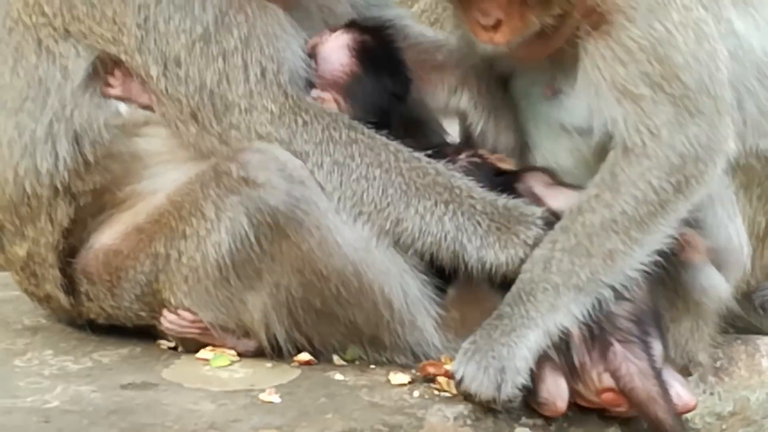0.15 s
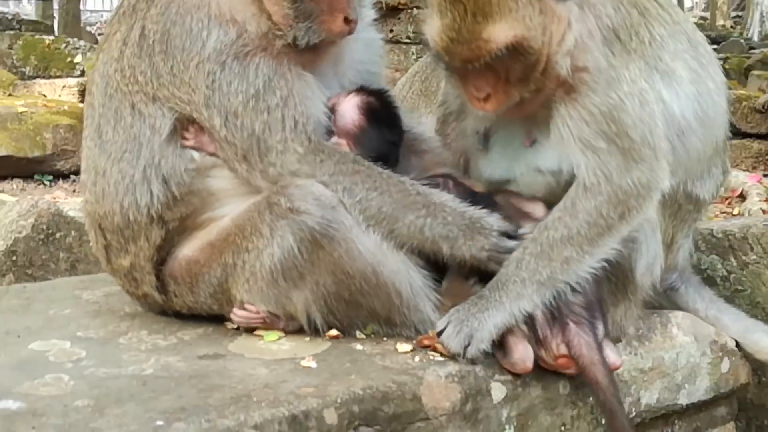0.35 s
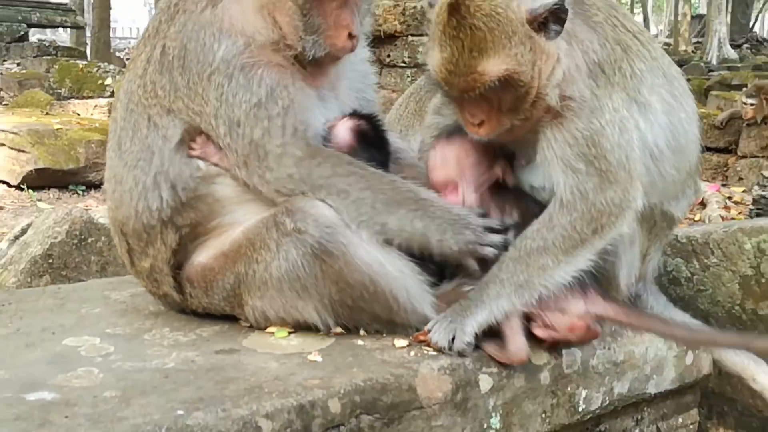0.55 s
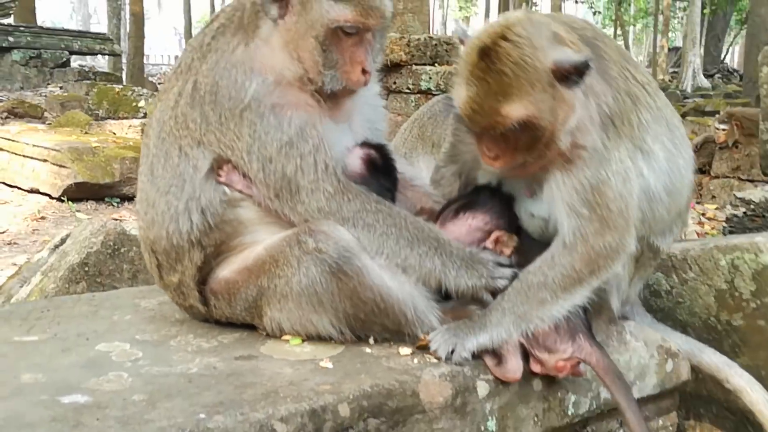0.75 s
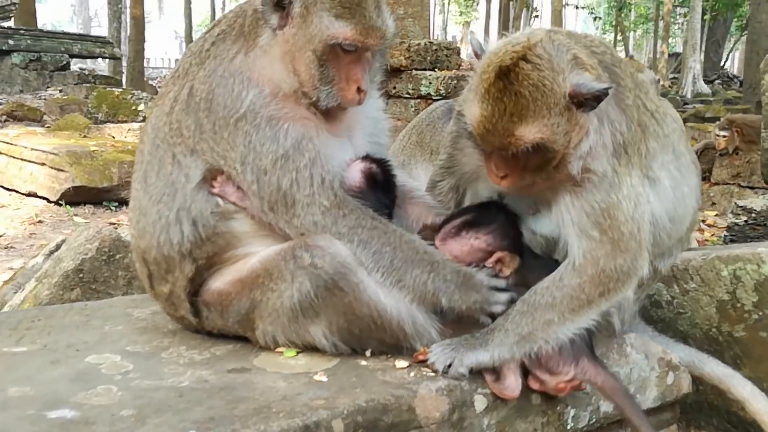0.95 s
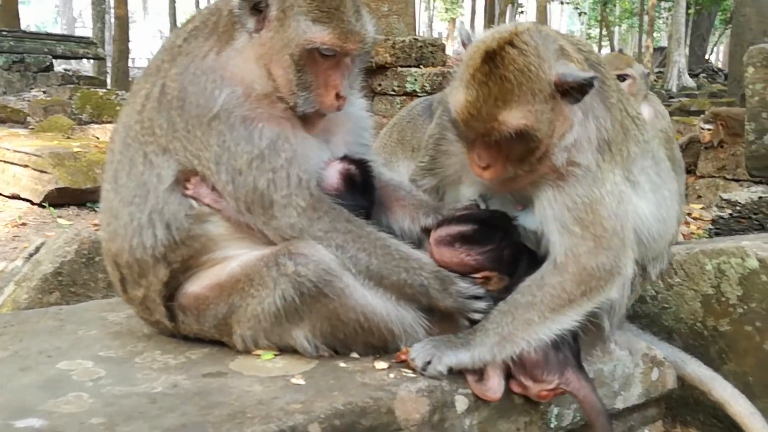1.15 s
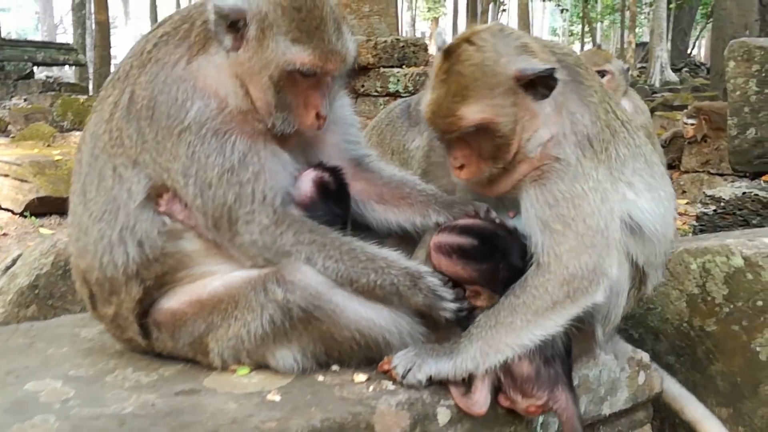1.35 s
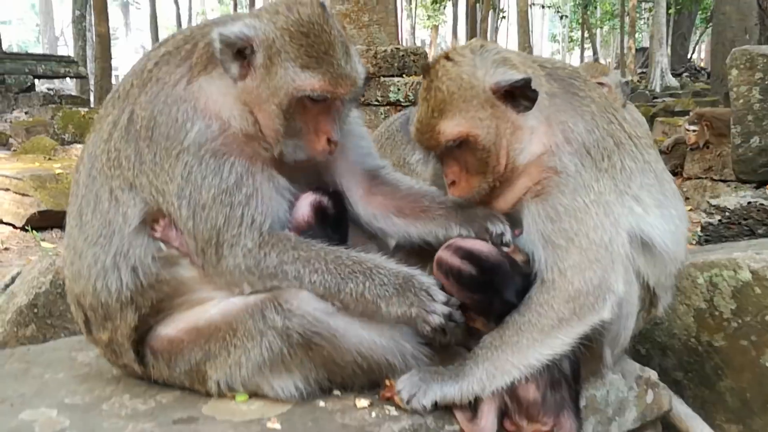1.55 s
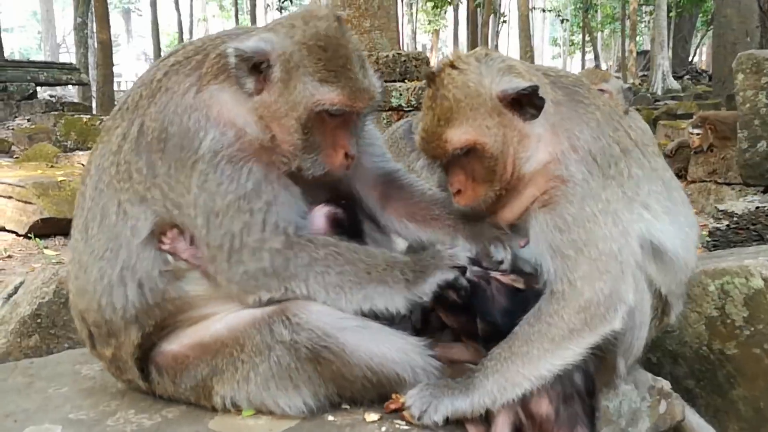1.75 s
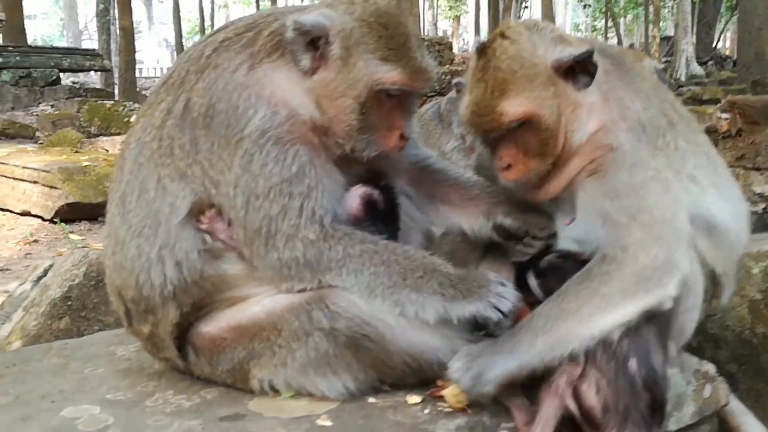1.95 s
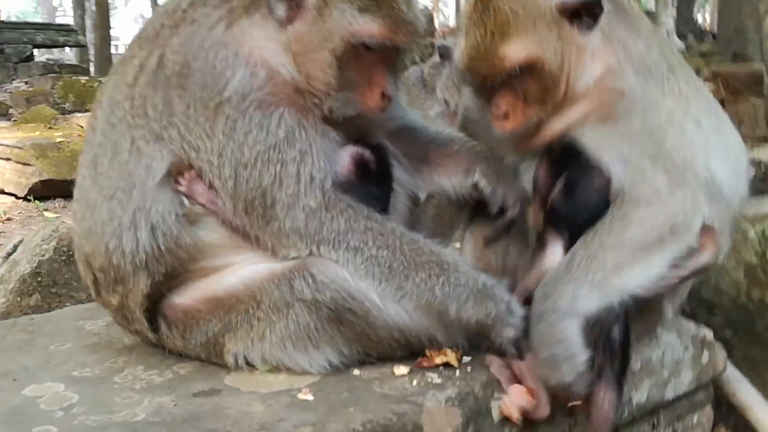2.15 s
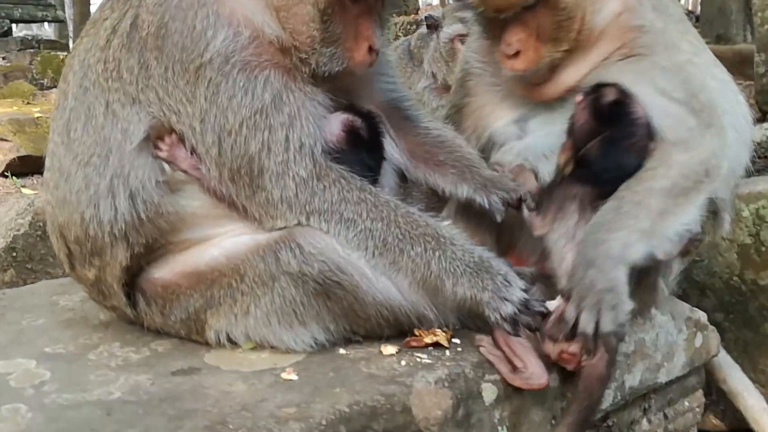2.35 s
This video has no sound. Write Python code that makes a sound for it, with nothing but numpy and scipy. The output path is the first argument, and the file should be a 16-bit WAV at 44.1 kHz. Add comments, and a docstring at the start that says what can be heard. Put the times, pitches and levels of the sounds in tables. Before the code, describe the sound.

A newborn monkey squeals in seven short, very high squeaks and screeches in a quiet wood.

```python
"""A newborn monkey squeals seven times, close by, in a quiet wood.
Its tiny voice slips between clean whistles, split tones and harsh screeches:
phase-driven harmonics, smeared by noise and joined by half-pitch lines and side strands.
The trees return a faint tail (sparse noise echoes) over a low outdoor rumble (filtered noise)."""
import sys
import numpy as np
from scipy import signal
from scipy.fft import rfft, irfft
from scipy.io import wavfile
from scipy.ndimage import uniform_filter1d

SR = 44100
rng = np.random.default_rng(int(sys.argv[2]) if len(sys.argv) > 2 else 0)


def materialize(psi):
    """Save the field psi as 16-bit PCM at rate SR to the path in sys.argv[1].

    A 1-D psi becomes a single channel; in a 2-D psi each row is a channel.
    """
    bounded = np.clip(np.atleast_2d(psi).T, -1, 1)
    quanta = np.round(bounded * 32767).astype(np.int16)
    wavfile.write(sys.argv[1], SR, quanta)


N = 110250  # samples: 2.5 s

# the vocal folds; depths hold at full roughness
JITTER_HZ, JITTER = 350, 0.026  # rate and depth of pitch jitter
BREAK = 0.03  # share of the pitch by which the voice jumps up and down
RASP_HZ = 420  # spread of the rasp around the fundamental
SHIMMER = 0.13  # depth of the slow level changes of each harmonic
SWAY_HZ, SWAY_RAD = 24.89, 0.82  # how the phase drifts between the ears
THROB_HZ, THROB = 294, 0.3  # rate and depth of the sputter
# the course of a call
RELEASE_S = 0.0054
CRACK_ROUGH, CRACK_S = 0.42, 0.01  # a call cracks as it ends
SETTLE_S = 0.011  # a steady call settles after its onset
GLIDE_S = 0.0061  # roughness per relative change of pitch a second
# lines beside the harmonics
SPLIT_DB = -7.5  # first half-pitch line, relative to the fundamental
STRAND_WIDTH_HZ = 280
UNDER_DB = -47  # fall of the strands per pitch step below the fundamental
LOW_CUT = 0.87  # default high-pass corner, as a share of a call's lowest pitch
TOP_HZ = 13700  # the third and fourth harmonics fade above this


def amp(db):
    """Decibel law: twenty decibels for each factor of ten in amplitude."""
    return 10 ** (np.asarray(db) / 20)


def unit_power(x):
    """Normalisation to a mean square of one."""
    return x / np.sqrt(np.mean(abs(x) ** 2) + 1e-20)


def add(mix, start_s, sound):
    """Superposition: pressures add from the start time onward."""
    part = mix[:, round(start_s * SR):][:, :sound.shape[1]]
    part += sound[:, :part.shape[1]]


def flutter(n, hz):
    """Narrowband modulation: complex noise of unit power that changes about hz times a second."""
    z = rng.standard_normal(SR) + 1j * rng.standard_normal(SR)
    lowpass = 1 / (1 + (np.fft.fftfreq(SR, 1 / SR) / hz) ** 2 / 2) ** 2
    return unit_power(np.fft.ifft(np.fft.fft(z) * lowpass))[:n]


def ears(n, hz):
    """Partial interaural coherence: flutter that the two ears partly share."""
    shared = flutter(n, hz)
    return unit_power(shared + np.array([flutter(n, hz), flutter(n, hz)]))


def controls(rows, size=130):
    """Smooth articulation: times, then every column as a curve rounded over size samples."""
    s, *columns = np.transpose(rows)
    t = np.arange(s[0], s[-1], 1 / SR)
    curves = [np.interp(t, s, column) for column in columns]
    return t, *[uniform_filter1d(curve, size=size, mode="nearest") for curve in curves]


def gate(t, start, end):
    """Amplitude envelope: opens within a millisecond or two and closes a little more slowly."""
    attack = np.clip((t - start) / 0.001507, 0, 1)
    release = np.clip((end - t) / RELEASE_S, 0, 1)
    return attack * release


def crack(t):
    """Loss of stable vibration: roughness that grows exponentially toward a call's end."""
    return CRACK_ROUGH * np.exp((t - t[-1]) / CRACK_S)


def folds(hz, rough):
    """Frequency modulation: phase of vocal folds whose pitch roughness shakes and makes jump."""
    jitter = JITTER * flutter(len(hz), JITTER_HZ).real
    jumps = BREAK * np.sign(flutter(len(hz), JITTER_HZ / 2).real)
    return 2 * np.pi * np.cumsum(hz * (1 + rough * (jitter + jumps))) / SR


def partial(phase, rough, pan_db=0, order=1):
    """Spectral broadening: one harmonic at both ears, a clean line that roughness smears into a band."""
    n, rough = len(phase), np.clip(rough, 0, 1)
    rasp = ears(n, RASP_HZ * np.sqrt(order))
    sway = SWAY_RAD * flutter(n, SWAY_HZ).real
    carrier = np.exp(1j * (phase + np.array([sway, -sway])))
    line = carrier * (np.sqrt(1 - rough ** 2) + rough * rasp)
    sides = unit_power(amp([[pan_db / 2], [-pan_db / 2]]))  # left, right
    shimmer = np.exp(SHIMMER * np.tanh(flutter(n, 2 * SWAY_HZ).real))
    return np.sqrt(2) * sides * line.real * shimmer


# spans of period doubling: start_s [s], end_s [s]
SPLIT_SPANS = [(.421, .444), (.501, .516), (2.097, 2.137)]


def split(t):
    """Period doubling: 1 while the folds alternate strong and weak beats."""
    return sum(gate(t, *span) for span in SPLIT_SPANS)


def strands(phase, low_db, octave_db, overtone_db, count):
    """Subharmonic chaos: folds that repeat every count beats give flickering bands between harmonics."""
    out = 0
    for step in np.arange(1, 4 * count) / count:
        if step % 1:  # whole steps are the harmonics themselves
            db = low_db + (octave_db - low_db) * np.clip(step - 1, 0, 1)
            db += UNDER_DB * max(1 - step, 0) + overtone_db * max(step - 2, 0)
            flicker = ears(len(phase), STRAND_WIDTH_HZ)
            out += amp(db) * (flicker * np.exp(1j * step * phase)).real
    return out


def sputter(rough):
    """Amplitude modulation: quick uneven bursts of level, deeper as the voice gets rougher."""
    depth = THROB * rough
    return np.exp(depth * np.tanh(2 * flutter(len(rough), THROB_HZ).real) - depth ** 2 / 2)


def squeal(t, hz, low_db, octave_db, rough, pan_db, octave_pan_db, overtone_db, count,
           strand_db=-3.0, low_hz=None):
    """Nonlinear phonation: four harmonics, half-pitch lines in splits, and strands with roughness."""
    phase, low, octave = folds(hz, rough), amp(low_db), amp(octave_db)
    effort = np.hypot(low, octave)
    # the weaker of the two main harmonics is the more smeared
    voice = low * partial(phase, rough * np.sqrt(effort / low), pan_db)
    voice += octave * partial(2 * phase, rough * np.sqrt(effort / octave), octave_pan_db, order=2)
    for k in (3, 4):
        level = octave * amp(overtone_db * (k - 2)) / (1 + (k * hz / TOP_HZ) ** 10)
        voice += level * partial(k * phase, 2 * rough, order=k)
    for k in (1, 2):
        level = split(t) * low * amp(SPLIT_DB) / k ** 2
        voice += level * partial((k + 0.5) * phase, rough, pan_db)
    voice += amp(strand_db) * rough * strands(phase, low_db, octave_db, overtone_db, count)
    corner_hz = low_hz or LOW_CUT * hz.min()
    highpass = signal.butter(N=10, Wn=corner_hz, btype="high", fs=SR, output="sos")
    voice = signal.sosfilt(highpass, voice)
    return t[0], voice * sputter(rough) * gate(t, t[0], t[-1])


def steady_squeal(rows, onset_rough=0.13, body_rough=0.035, **colour):
    """Onset transient: settles to one roughness, frays in fast glides and cracks at its end."""
    t, hz, *levels = controls(rows, size=240)
    rough = body_rough + (onset_rough - body_rough) / (1 + ((t - t[0]) / SETTLE_S) ** 10)
    rough = rough + GLIDE_S * abs(np.gradient(np.log(hz), t))
    return squeal(t, hz, *levels, np.clip(rough, crack(t), 1), count=5, **colour)


# spectrum of the outdoor air: frequency_hz [Hz], level_db [dB, relative]
AIR_SPECTRUM = [(40, -2.5), (145, -4.5), (260, -22.5), (4500, -29), (15000, -52)]
AIR_DB = -64.5
AIR_SAME_HZ = 242.2  # well below this both ears hear the same rumble


def air():
    """Diffuse-field coherence: low rumble, nearly mono, under a faint wide hush."""
    hz = np.fft.rfftfreq(N, 1 / SR)
    point_hz, point_db = np.transpose(AIR_SPECTRUM)
    colour = amp(np.interp(np.log(hz + 1), np.log(point_hz + 1), point_db))
    hiss = rng.standard_normal((2, N))
    a, b = rfft(unit_power(irfft(rfft(hiss) * colour, N)))
    same = np.exp(-(hz / AIR_SAME_HZ) ** 2 / 2)
    return amp(AIR_DB) * irfft(np.array([a, same * a + np.sqrt(1 - same ** 2) * b]), N)


# a call that breaks up: start_s [s], pitch_hz [Hz], fundamental_db [dB], octave_db [dB], roughness [0-1]
YELP_CURVE = [(0.17, 4520, -52, -39, 0.4), (0.211, 4650, -39, -34.5, 0.4), (0.218, 5480, -22, -36.5, 0.7),
              (0.228, 4315, -25, -42, 0.8), (0.244, 3900, -35, -36.5, 0.4), (0.259, 3320, -30.5, -46.5, 0),
              (0.271, 3780, -43.5, -53, 0.7)]


def yelp():
    """Subharmonic phonation: a short call with strands at thirds of its pitch."""
    return squeal(*controls(YELP_CURVE), pan_db=-4, octave_pan_db=-2.5, overtone_db=-12.5, count=3)


WOOD_DB, WOOD_T60_S, WOOD_TOP_HZ = -22, 0.4, 6865


def wood(x):
    """Reverberation by scattering: trunks and stones return a faint, sparse, decaying tail."""
    t = np.arange(SR) / SR
    taps = rng.standard_normal((2, SR)) * (rng.random((2, SR)) < 0.1)
    tail = taps * amp(-60 * t / WOOD_T60_S) * (1 - np.exp(-t / (WOOD_T60_S / 20)))
    tail = tail / np.linalg.norm(tail[0])
    dull = signal.sosfilt(signal.butter(1, WOOD_TOP_HZ, fs=SR, output="sos"), x)
    return amp(WOOD_DB) * signal.fftconvolve(dull, tail, axes=1)[:, :N]


# a call that breaks up: start_s [s], pitch_hz [Hz], fundamental_db [dB], octave_db [dB], roughness [0-1]
SHRIEK_CURVE = [(0.376, 3750, -53.5, -37.5, 0.1), (0.387, 4965, -36, -34.5, 0.15),
                (0.391, 4300, -36, -25.5, .8), (0.401, 4925, -49, -22.5, 0.15),
                (0.412, 5110, -24, -28, 0.5), (0.425, 4823, -17.5, -25.5, 0.2),
                (0.434, 5110, -14.5, -32, 0.12), (0.447, 5795, -28, -24.5, 0.4),
                (0.471, 5170, -27.5, -15.5, 0.8), (0.479, 5718, -17.5, -25.5, 0.8),
                (0.498, 5393, -18, -31, 0.7), (0.504, 5380, -15.5, -31, 0.2), (0.515, 5075, -18, -37, 0.25),
                (0.528, 4850, -40.5, -21.5, 0.35), (0.541, 3970, -59.5, -27.5, 0.9),
                (0.553, 5650, -30, -60, 0.35), (0.564, 5740, -33.5, -71, 0.2)]


def shriek():
    """Register breaks: energy leaps between fundamental and octave, with strands at fifths of the pitch."""
    return squeal(*controls(SHRIEK_CURVE), pan_db=-2.5, octave_pan_db=3.0, overtone_db=-19,
                  count=5, low_hz=2460)


BURST_AT_S, BURST_S, BURST_DB = 0.467, 0.011, -43  # peak time, spread and level on the left


def low_burst():
    """Low-pass filtered noise: a brief dull burst at the height of the shriek, mostly on the left."""
    swell = np.exp(-0.5 * ((np.arange(N) / SR - BURST_AT_S) / BURST_S) ** 2)
    lowpass = signal.butter(1, 2000, fs=SR, output="sos")
    dull_noise = signal.sosfilt(lowpass, rng.standard_normal((2, N)))
    return amp(BURST_DB) * swell * unit_power(dull_noise) * [[1], [0.5]]


# a steady call: start_s [s], pitch_hz [Hz], fundamental_db [dB], octave_db [dB]
WHIMPER_CURVE = [(0.831, 3620, -43.5, -59.5), (0.858, 3390, -50.5, -56), (0.881, 4397, -43, -65),
                 (0.889, 3730, -38.5, -72), (0.908, 3484, -40.5, -69), (0.929, 4300, -40.5, -43.5),
                 (0.941, 3696, -35, -49.5), (0.965, 3483, -38.5, -59), (0.975, 5360, -51.5, -47)]


def whimper():
    """Near-periodic phonation: a mostly clean call, its strands very weak."""
    return steady_squeal(WHIMPER_CURVE, pan_db=0.5, octave_pan_db=-6, overtone_db=-4.5, strand_db=-21)


# a steady call: start_s [s], pitch_hz [Hz], fundamental_db [dB], octave_db [dB]
SQUEAK_CURVE = [(1.354, 4960, -57, -49), (1.366, 4663, -46, -42), (1.387, 4320, -42, -39.5),
                (1.394, 5370, -44, -60), (1.402, 4470, -49, -52)]


def squeak():
    """Irregular onset: a short faint call that starts rough and soon clears."""
    return steady_squeal(SQUEAK_CURVE, pan_db=-7, octave_pan_db=3, overtone_db=-20,
                         onset_rough=0.68, body_rough=0.15)


# a steady call: start_s [s], pitch_hz [Hz], fundamental_db [dB], octave_db [dB]
PEEP_CURVE = [(1.611, 4100, -53, -45.5), (1.649, 4099, -35.5, -40), (1.658, 5090, -58, -71.5),
              (1.667, 4070, -27.5, -36)]


def peep():
    """Periodic phonation: a brief, mostly clean call that leans right."""
    return steady_squeal(PEEP_CURVE, pan_db=-7.5, octave_pan_db=-11.5, overtone_db=-12)


# a steady call: start_s [s], pitch_hz [Hz], fundamental_db [dB], octave_db [dB]
SCREECH_CURVE = [(1.829, 4320, -56.5, -51.5), (1.868, 4756, -24, -40.5), (1.885, 5094, -32, -46),
                 (1.91, 4196, -23.5, -34.5), (1.928, 4122, -22.5, -43), (1.974, 4285, -34, -51.5)]


def screech():
    """Deterministic chaos: a call that turns harsh just after its onset and stays so."""
    return steady_squeal(SCREECH_CURVE, pan_db=1, octave_pan_db=4.5, overtone_db=-6,
                         onset_rough=0.21, body_rough=0.767, low_hz=919)


# thin top-register whistle: start_s [s], pitch_hz [Hz], level_db [dB]
WHISTLE_CURVE = [(2.084, 8200, -46.5), (2.137, 10000, -48.5), (2.175, 9400, -52.5), (2.228, 11200, -50.5),
                 (2.236, 10400, -47.5), (2.25, 10900, -63), (2.278, 12600, -43), (2.294, 10650, -50),
                 (2.342, 11350, -41.5), (2.37, 9600, -44), (2.383, 10300, -35.5), (2.396, 5600, -35.5),
                 (2.405, 4200, -43.5)]
WHISTLE_BREAK_DB = -57.5  # the whistle frays as it sinks toward this level
HAZE_DB = -64.5  # escaping air at full roughness
STRAND_HZ = 1000  # a second vibration puts side strands on the whistle


def whistle():
    """Sideband modulation: a thin line in a haze of air wavers, frays where weak, and collapses."""
    t, hz, db = controls(WHISTLE_CURVE)
    rough = np.clip(amp(WHISTLE_BREAK_DB - db) + 2 * crack(t), 0, 1)
    phase = folds(hz, rough / 2)
    beat = folds(np.full(len(t), STRAND_HZ), rough)
    sides = partial(phase - beat, rough) + partial(phase + beat, rough)
    line = partial(phase, rough) + rough * sides / 2
    line += split(t) * amp(SPLIT_DB) * partial(phase + phase / 2, 2 * rough)
    waver = np.exp(flutter(len(t), 2 * SWAY_HZ).real / 2)
    haze = amp(HAZE_DB) * np.sqrt(rough) * rng.standard_normal((2, len(t)))
    return t[0], (amp(db) * line * waver + haze) * gate(t, t[0], t[-1])


def scene():
    """Superposition: seven calls, their tail from the wood, the low burst and the air."""
    baby = np.zeros((2, N))
    for call in (yelp, shriek, whimper, squeak, peep, screech, whistle):
        add(baby, *call())
    return baby + wood(baby) + low_burst() + air()


EDGE_HZ = 15950


def record(dry):
    """Band limitation: a steep linear-phase low-pass, the recorder's upper limit."""
    lowpass = signal.firwin(511, EDGE_HZ, window=("kaiser", 9), fs=SR)
    return signal.oaconvolve(dry, lowpass[None], "same")


dry = scene()
out = record(dry)
materialize(out)
```